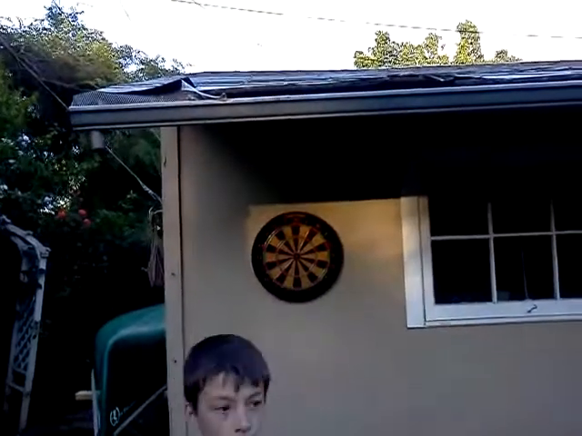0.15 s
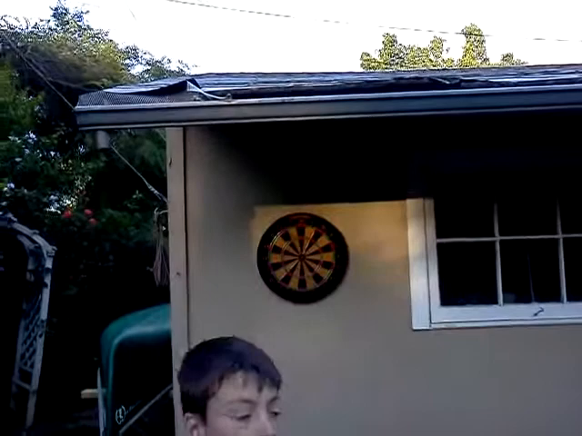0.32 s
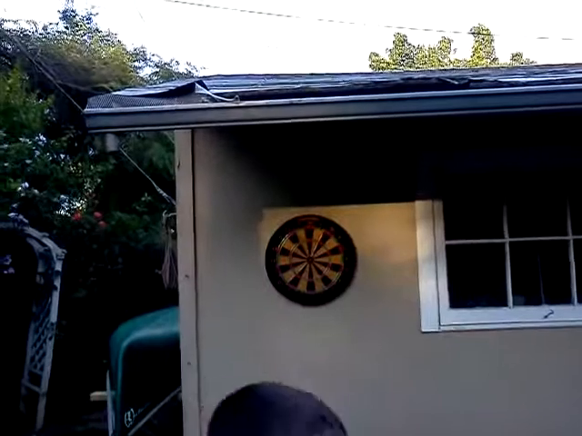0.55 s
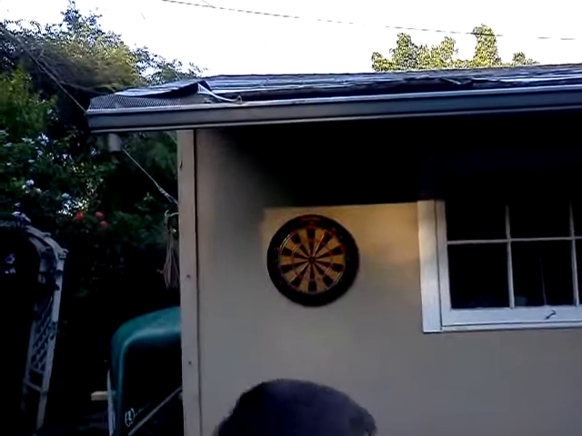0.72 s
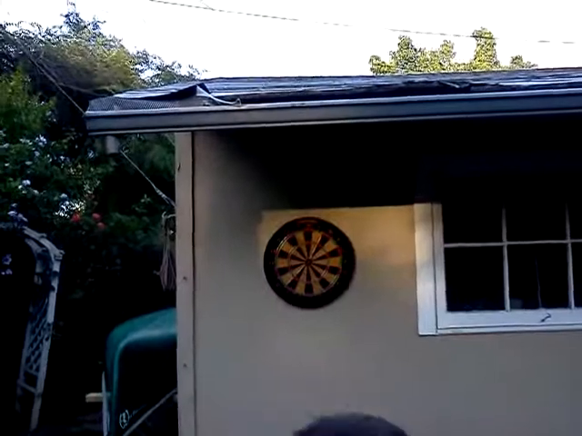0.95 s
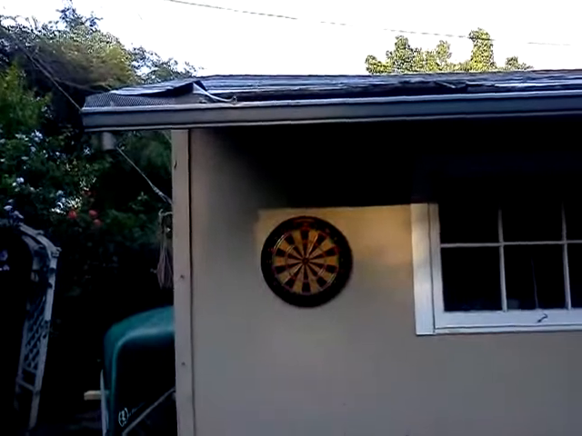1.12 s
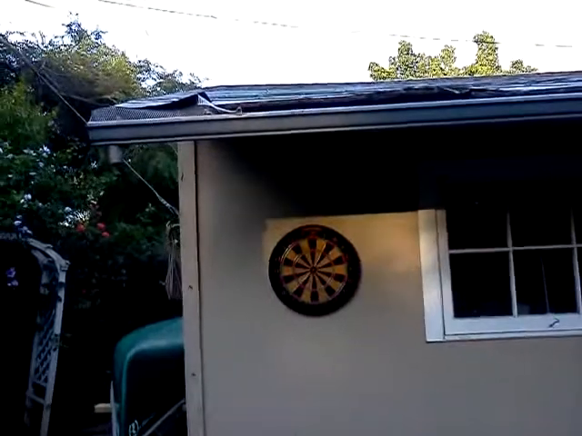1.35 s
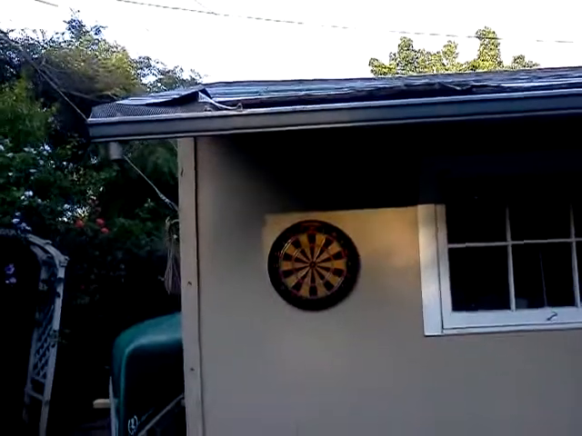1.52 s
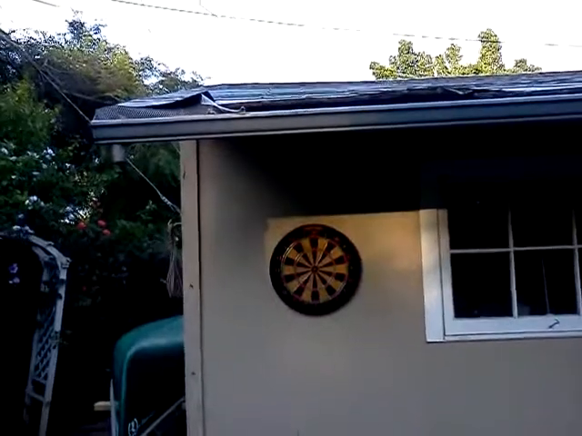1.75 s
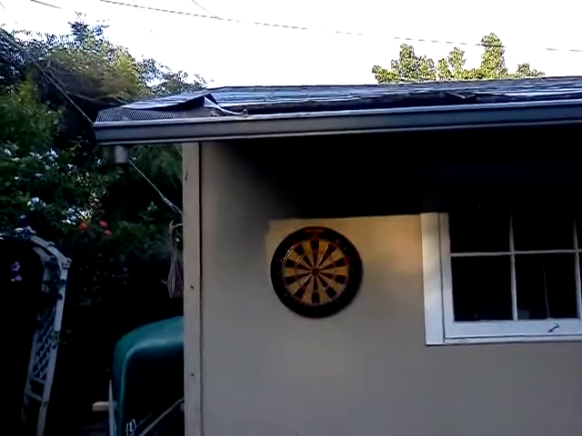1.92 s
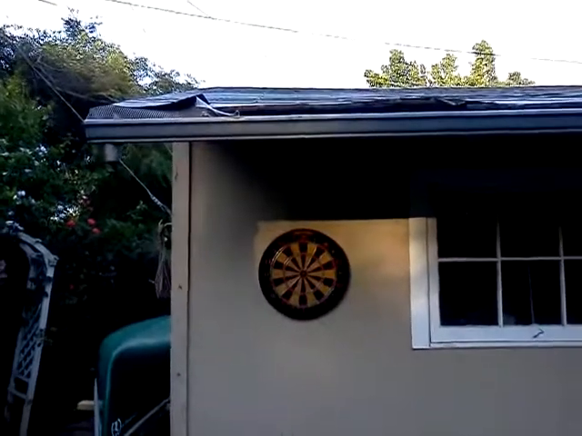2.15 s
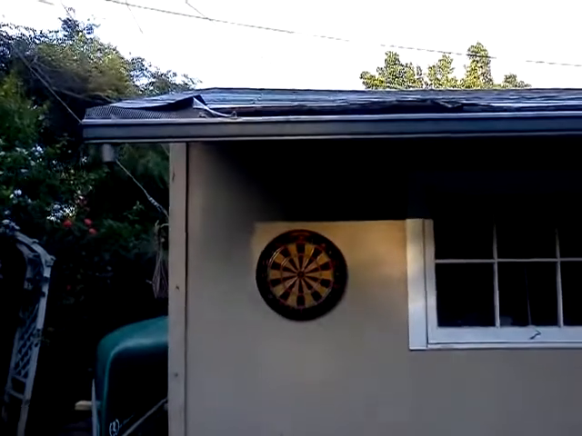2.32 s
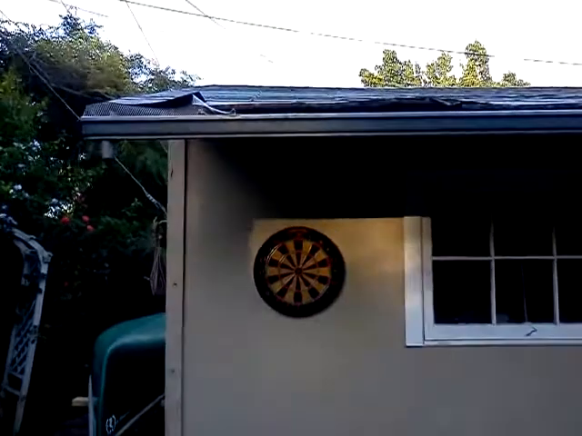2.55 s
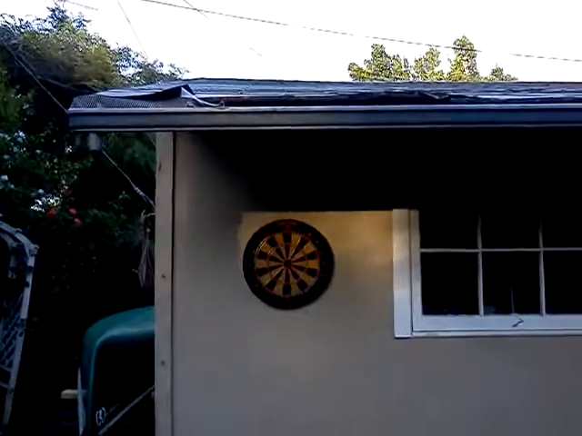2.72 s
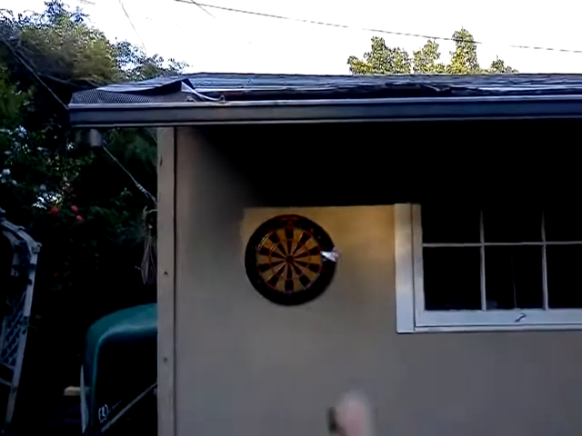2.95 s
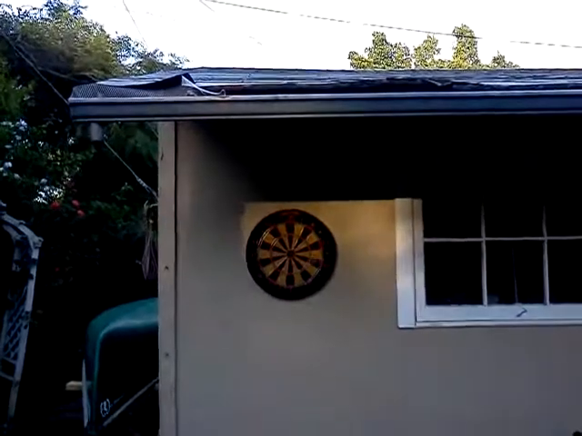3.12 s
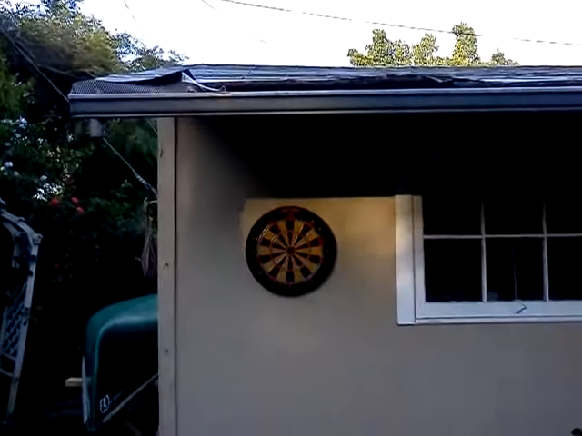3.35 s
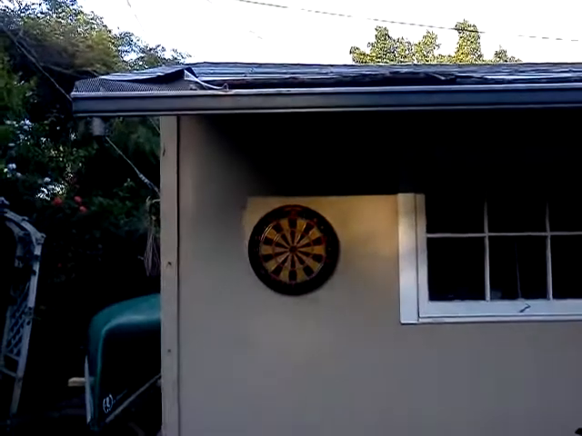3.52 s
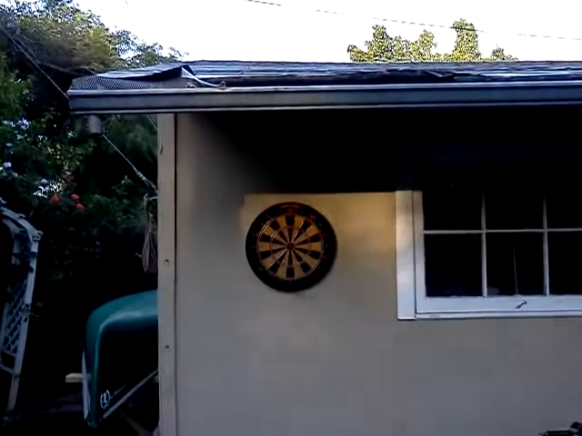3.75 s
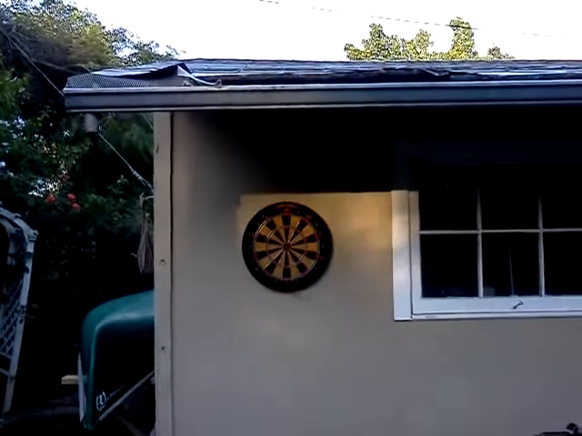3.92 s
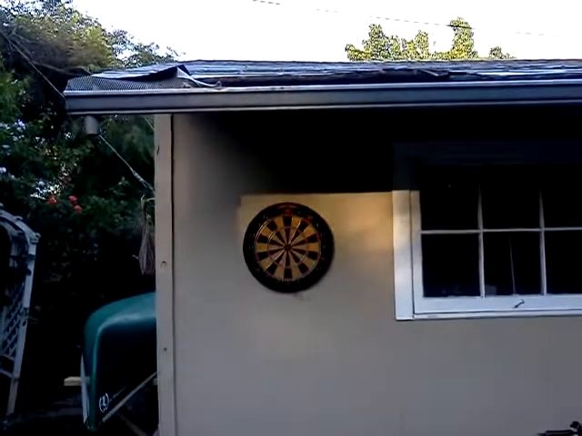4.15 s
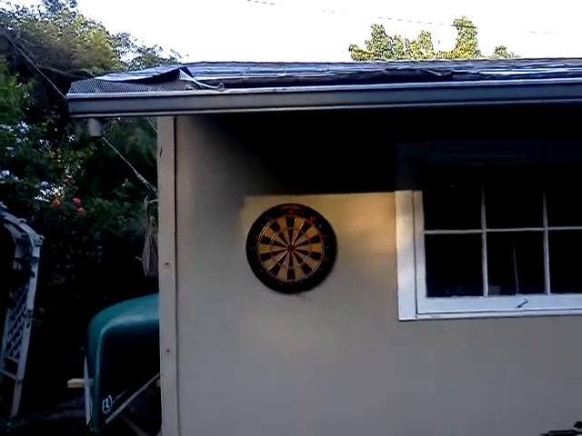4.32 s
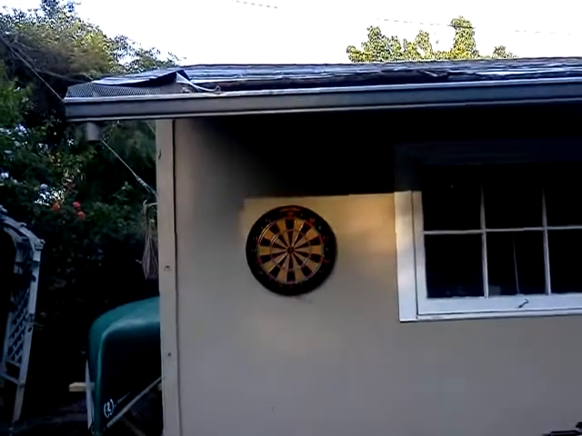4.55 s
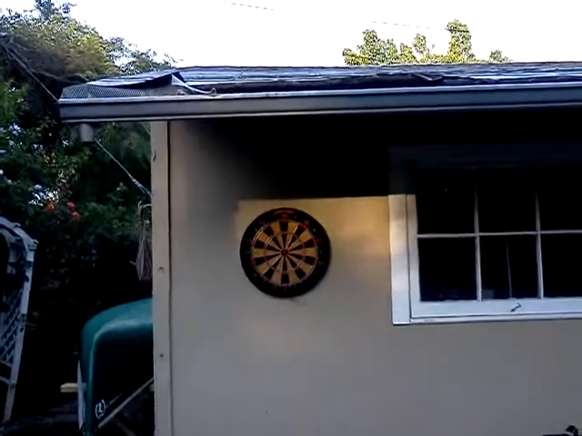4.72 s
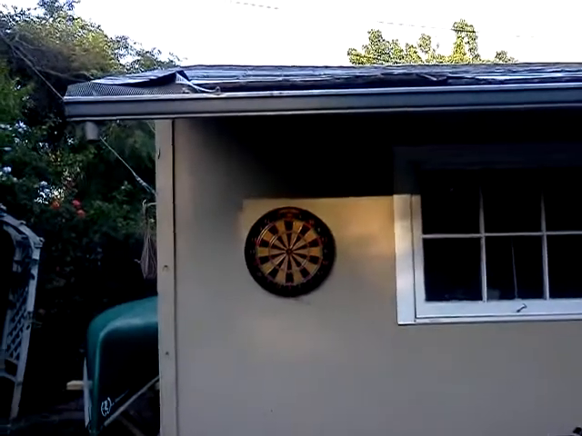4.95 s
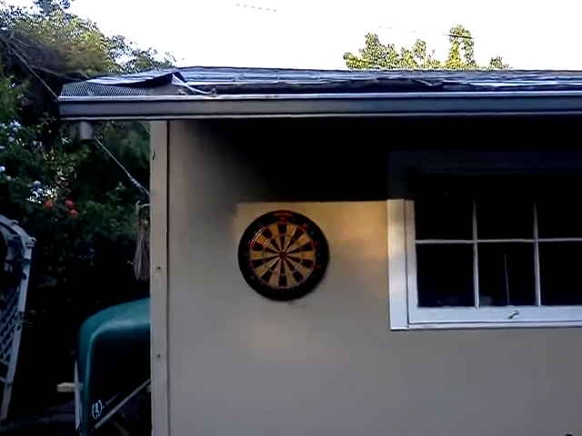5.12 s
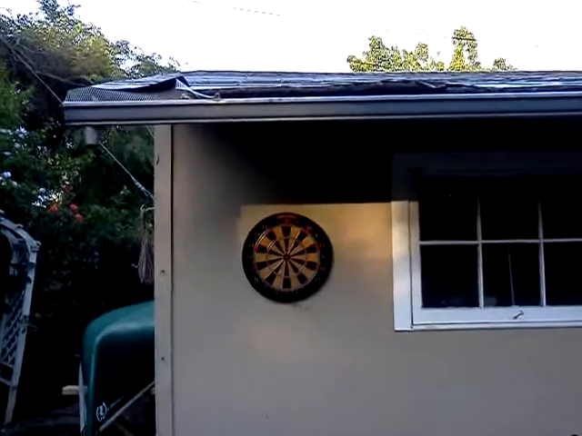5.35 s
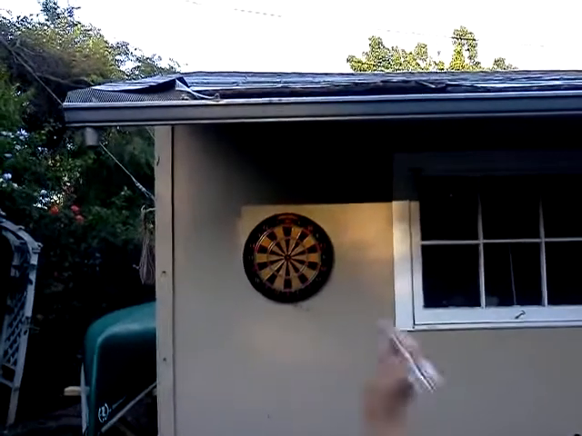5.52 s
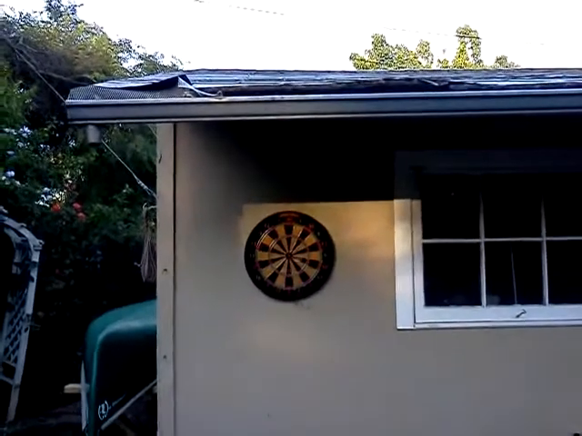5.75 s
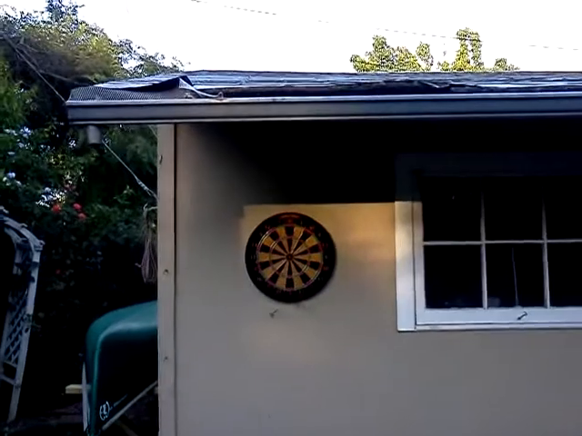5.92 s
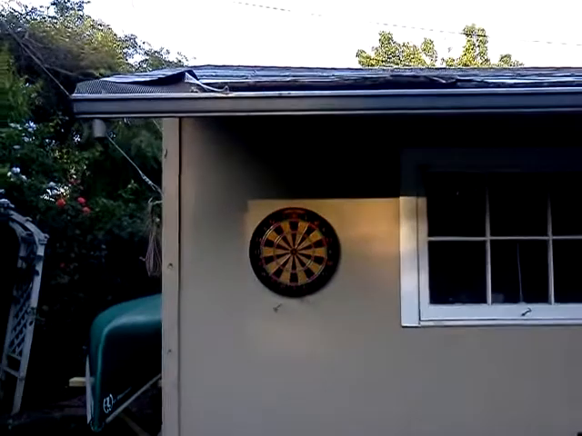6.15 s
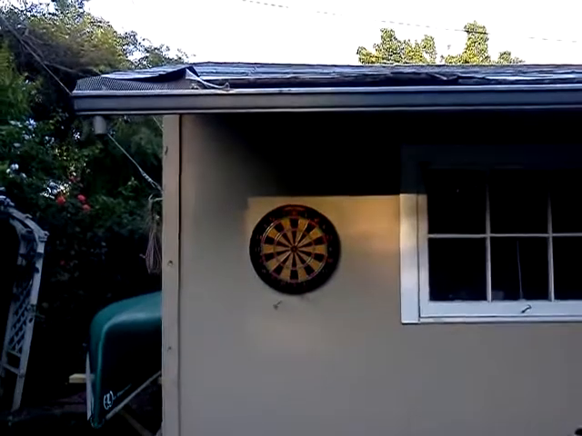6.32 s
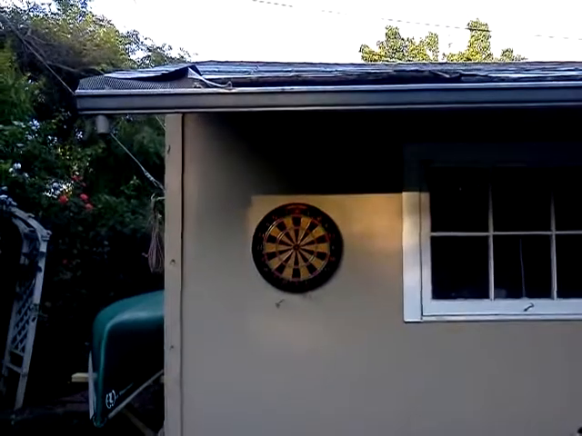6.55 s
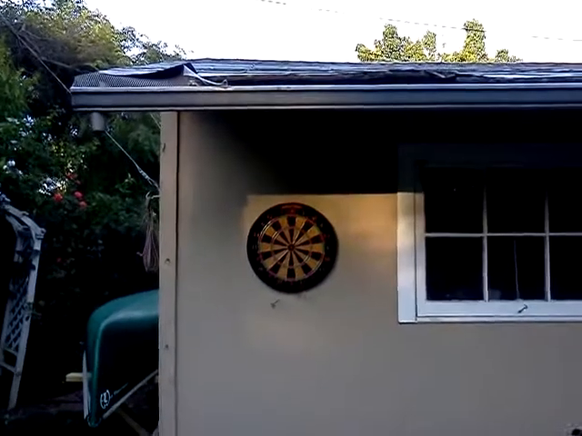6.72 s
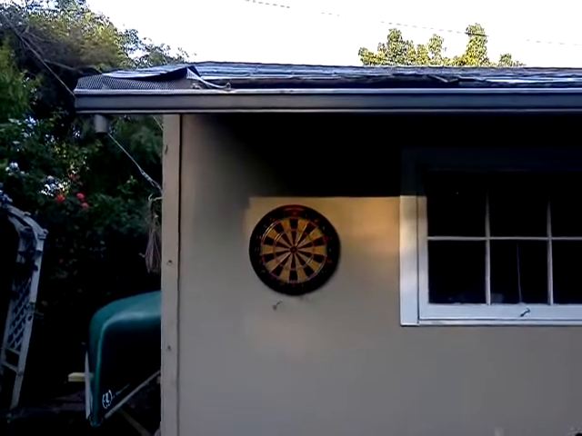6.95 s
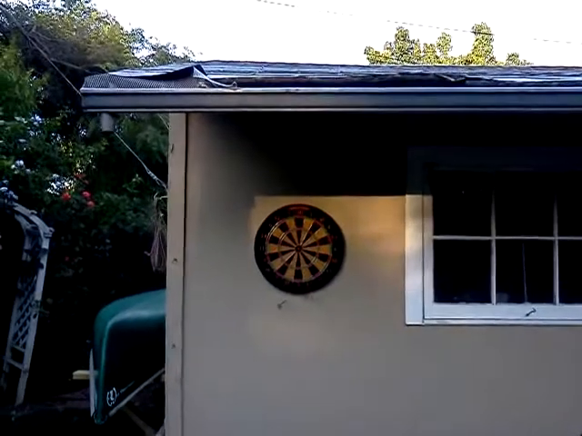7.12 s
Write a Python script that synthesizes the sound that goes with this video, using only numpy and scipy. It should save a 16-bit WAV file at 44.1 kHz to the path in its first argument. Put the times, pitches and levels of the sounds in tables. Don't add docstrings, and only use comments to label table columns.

```python
import sys
import numpy as np
from scipy import signal
from scipy.io import wavfile
from scipy.ndimage import uniform_filter1d

SR = 44100
rng = np.random.default_rng(int(sys.argv[2]) if len(sys.argv) > 2 else 0)


def master(y):
    cut = np.clip(np.atleast_2d(y).T, -1, 1)
    pcm = np.round(cut * 32767)
    wavfile.write(sys.argv[1], SR, pcm.astype(np.int16))


def volts_from_decibels(level):
    exponent = np.asarray(level, float) / 20
    return 10 ** exponent


N = 316365

# f/Hz, level/dB per Hz
YARD_WASH = [(15, -58.5), (40, -18), (90, -20.5), (150, -22.5), (232, 1), (350, -0.5), (560, -7.5),
             (950, -10), (1300, -17), (1700, -20), (2100, -25), (3300, -25.5), (4500, -29)]
# f/Hz, rms level/dB
MAINS_HUM = [(250, -73), (350, -52), (400, -60.5), (600, -64), (700, -78.5)]
# t/s, length/s, level/dB
RUSTLE = [
    (0, 0.051, -63),
    (0.282, 0.15, -62),
    (0.546, 0.076, -68),
    (0.794, .11, -63),
    (4.39, .12, -86.5),
]
# t/s, peak level/dB, f/Hz, T60/s
TICKS = [
    (0.33, -35.5, 1180, 0.025),
    (4.355, -63, 1260, .05),
    (4.415, -49, 1760, .06),
    (4.475, -50, 1860, 0.081),
    (4.555, -40, 1850, 0.025),
    (4.557, -51, 2670, .03),
]
# t/s, level/dB, clearness/dB per octave
ENGINE_PASS = [(0, -47.5, 4.5), (.35, -47.5, 2), (0.699, -45, 0.5), (1.2, -43, 2.5), (1.598, -42, 1),
               (1.899, -41, -1), (2.398, -41.5, 4), (2.798, -41.5, -2.5), (3.102, -44, -7.5),
               (3.702, -47.5, -6), (4.051, -45.5, -13.5), (4.45, -49.5, -3), (4.8, -56, 6),
               (5.5, -54.5, -3.5), (6.399, -57, 8)]
# multiple of the cycle rate, level/dB against neighbouring strong orders
FIRING_ORDERS = [(4.5, -13), (6, 0.5), (8, -21.5), (8.5, -4.5), (9.5, -8.5), (11, -4), (12, 0), (13.5, -12),
                 (15, -4.5), (16, -2.5), (17.5, -14), (19, -7.5), (20, -16.5), (24, -16), (31, -22)]
# order, slope/dB per dB of loudness, level/dB gained ahead and lost behind
BEAM = [(6, 1.73, -1), (12, 2, -6.5), (16, 1.3, 7), (19, 1.7, 4.5)]
# f/Hz, level/dB per Hz
EXHAUST_ROAR = [(30, -41.5), (60, -12), (125, -20), (216, -1.5), (300, -1.5), (450, -1.5), (650, -4.5),
                (900, -10.5), (1250, -22), (1700, -32.5), (2500, -49.5), (4000, -81)]
# f/Hz, T60/s
TAIL_DECAY = [(150, 0.57), (400, 0.37), (1000, 0.48), (2000, 0.49), (4000, 0.63)]
# f/Hz, level/dB
SURFACE_LOSS = [(1800, -2), (2600, -8), (4500, -18)]
# delay/s, level/dB, brightness 0-1
SLAPS = [
    [(.05, -21.5, 0), (.085, -29.5, 0), (.125, -29.5, 0), (.19, -41, .4)],
    [(.052, -20, 0.3), (.072, -28.5, 0), (.108, -27.5, 1), (.165, -37, 0.4)],
]
# t/s, blow level/dB, crack level/dB, free ringing/s, damping/dB
DARTS = [
    (3.2546, 1, -4.5, .034, 0),
    (5.9001, 7, -0.5, 0.014, -15.5),
]
# f/Hz, level/dB, T60/s
WALL_MODES = [
    [(238.9, 4, 0.11), (306, -13.5, 0.19), (338.2, -9, 0.29), (407.5, -15.5, 0.18), (426.2, -8.5, 0.26),
     (526, 0, 0.082), (641.5, 13, 0.037), (793.5, -14, .12), (847, -4, 0.066), (1087, -9, 0.075),
     (1175, -13.5, .08), (1457, 7.5, 0.023), (1880, -11.5, 0.087), (2000, -9.5, 0.053), (2400, -11, 0.0079)],
    [(233.7, -15, 0.25), (272.7, 1, 0.27), (340, -0.5, 0.21), (395.8, -6.5, 0.24), (467, -13, 0.21),
     (605, -4, 0.09), (679.2, -0.5, 0.083), (777.5, -15, 0.15), (978, -7, 0.16), (1221, -8, 0.062),
     (1317, -1.5, 0.045), (1516, -9, 0.082), (1690, -13, 0.036), (1797, -24.5, 0.051), (2198, -14, 0.1)],
]
# f/Hz, level/dB per Hz
TIP_CRACK = [(30, -66.5), (100, -12), (240, -4.5), (650, 2), (1000, -8.5), (1500, -9), (2300, -20.5),
             (3300, -22), (4500, -17)]
# f/Hz, level/dB
MICROPHONE = [(3300, 0.5), (3500, -2), (3700, -8), (4100, -16.5), (4400, -32), (4700, -63)]

WASH_DB, WASH_PATCHY_DB = -48, 0.9
RUSTLE_RISE_S, RUSTLE_FALL_S = 0.0456, 0.011
CYCLE_HZ, DOPPLER_HZ = 37.58, 0.62
ABREAST_S, PASS_S = 2.0, 3.0
TONE_DB, LOUDEST_DB = -44.5, -41
TONE_CLEAR = 1.1
TAIL_DB = -13.5
SCATTER_T60_S = 0.12
RISE_S, SETTLE_S, CRACK_T60_S = 0.012, 0.018, 0.08
COUPLING_HZ = 50
LIMIT_DB, LIMIT_SHARE = -6.5, 0.43


def evened(x):
    return x / np.sqrt(np.mean(x ** 2) + 1e-20)


def read(points, hz):
    f, value = np.transpose(points)
    return np.interp(np.log(hz + 1), np.log(f + 1), value)


def add(mix, s, sound):
    part = mix[round(s * SR):][:len(sound)]
    part += sound[:len(part)]


def drift(top_hz):
    t = np.arange(0, N + 256, 256) / SR
    rates = np.geomspace(top_hz / 16, top_hz, num=16)
    waves = sum(np.sin(2 * np.pi * (f * t + rng.random())) for f in rates)
    return np.interp(np.arange(N) / SR, t, evened(waves))


def noise(shape_db, patchy_db):
    frames, hz = N // 256 + 5, np.fft.rfftfreq(1024, 1 / SR)
    t = np.arange(frames) * 256 / SR
    real, imaginary, patches = rng.standard_normal((frames, 513, 3)).T
    patches = uniform_filter1d(patches, size=8, axis=0)
    patches = evened(uniform_filter1d(patches, size=10, axis=1))
    gain = volts_from_decibels(shape_db(hz[:, None], t) + patchy_db * patches)
    return signal.istft((real + 1j * imaginary) * gain, nperseg=1024, noverlap=768)[1][:N]


def coloured(x, points):
    gain_db = np.maximum(read(points, abs(np.fft.fftfreq(8192, 1 / SR))), -100)
    log_gain = np.log(volts_from_decibels(gain_db))
    taps = np.fft.ifft(np.exp(np.conj(signal.hilbert(log_gain)))).real[:4096]
    return signal.oaconvolve(x, taps)[:len(x)]


def yard_wash():
    level_db = WASH_DB + 0.22 * drift(top_hz=34)
    return volts_from_decibels(level_db) * evened(noise(lambda f, t: read(YARD_WASH, f), WASH_PATCHY_DB))


def mains_hum():
    t = np.arange(N) / SR
    out = np.zeros(N)
    for hz, db in MAINS_HUM:
        level = np.sqrt(2) * volts_from_decibels(db + 0.47 * drift(top_hz=4.2))
        out += level * np.sin(2 * np.pi * (hz * t + rng.random()))
    return out


def rustle():
    t = np.arange(N) / SR
    unevenness = uniform_filter1d(rng.standard_normal(N), size=100) * 10
    grains = rng.standard_normal(N) * volts_from_decibels(5.6 * unevenness)
    band = signal.butter(4, [1800, 3500], "band", fs=SR, output="sos")
    cloth = evened(signal.sosfilt(band, grains))
    out = np.zeros(N)
    for s, length, db in RUSTLE:
        rise = (t - s) / RUSTLE_RISE_S + 0.5
        fall = (s + length - t) / RUSTLE_FALL_S + 0.5
        out += volts_from_decibels(db) * np.clip(np.minimum(rise, fall), 0, 1) * cloth
    return out


def ticks():
    t = np.arange(4000) / SR
    out = np.zeros(N)
    for s, db, hz, t60 in TICKS:
        envelope = volts_from_decibels(db - 60 * t / t60) * np.minimum(t / 0.0017, 1)
        wobble = 1.2 * evened(uniform_filter1d(rng.standard_normal(len(t)), size=60))
        add(out, s, envelope * np.sin(2 * np.pi * hz * t + wobble))
    return out


def engine():
    t = np.arange(N) / SR
    s, level, clearness = np.transpose(ENGINE_PASS)
    roar_db = np.interp(t, s, level)
    clear_db = np.interp(t, s, clearness)
    facing = (ABREAST_S - t) / np.hypot(ABREAST_S - t, PASS_S)
    rate_hz = (CYCLE_HZ + DOPPLER_HZ * facing) * (1 + 0.0017 * drift(top_hz=8))
    turns = np.cumsum(rate_hz) / SR
    order, follow, ahead_db = np.transpose(BEAM)
    tones = np.zeros(N)
    for k, db in FIRING_ORDERS:
        near_db = TONE_DB + np.interp(k, order, follow) * (roar_db - LOUDEST_DB)
        near_db += np.interp(k, order, ahead_db) * facing
        near_db += max(np.log2(k / 12), 0) * TONE_CLEAR * clear_db
        level = np.sqrt(2) * volts_from_decibels(near_db + db + 2.58 * drift(top_hz=23.84))
        tones += level * np.cos(2 * np.pi * (k * turns + rng.random()))

    def roar_shape(f, time):
        octaves = np.clip(np.log2((f + 1) / 550), 0, 1.3)
        return read(EXHAUST_ROAR, f) + np.interp(time, s, clearness) * octaves

    throb = 1 + 0.2 * np.cos(2 * np.pi * turns)
    return tones + volts_from_decibels(roar_db - 1.0) * throb * evened(noise(roar_shape, patchy_db=-0.85))


def echoes(x, slaps):
    taps = np.zeros(SR // 2)
    at = np.arange(900, len(taps) - 20, 20)
    taps[at + rng.integers(0, 20, len(at))] = rng.choice([-1., 1.], len(at))
    hz, t, z = signal.stft(taps, SR, nperseg=256)
    decay = volts_from_decibels(-60 * t / read(TAIL_DECAY, hz)[:, None])
    response = signal.istft(z * decay, SR, nperseg=256)[1]
    response *= volts_from_decibels(TAIL_DB) / np.linalg.norm(response)
    for delay, db, bright in slaps:
        smear = rng.standard_normal(400) * np.hanning(400)
        smear -= bright * uniform_filter1d(smear, size=40)
        add(response, delay, volts_from_decibels(db) * smear / np.linalg.norm(smear))
    return signal.fftconvolve(coloured(x, SURFACE_LOSS), response)


def wall_ring(blow_db, free_s, damp_db, modes):
    t = np.arange(SR // 2) / SR
    ring = np.zeros(len(t))
    for hz, db, t60 in modes:
        spread = np.minimum(t / RISE_S * np.cbrt(hz / 500), 1)
        ring += spread * volts_from_decibels(db - 60 * t / t60) * np.sin(2 * np.pi * (hz * t + rng.random()))
    damping = volts_from_decibels(damp_db * np.clip((t - free_s) / SETTLE_S, 0, 1))
    return volts_from_decibels(blow_db) * 0.65 * ring * damping


def tip_crack(crack_db):
    t = np.arange(SR // 2) / SR
    bite = np.minimum(1.4 * t / RISE_S, 1) * volts_from_decibels(-60 * np.maximum(t - RISE_S, 0) / CRACK_T60_S)
    return volts_from_decibels(crack_db) * evened(coloured(rng.standard_normal(len(t)), TIP_CRACK)) * bite


def scene():
    out = yard_wash() + mains_hum() + rustle() + ticks() + engine()
    for (s, blow_db, crack_db, free_s, damp_db), modes, slaps in zip(DARTS, WALL_MODES, SLAPS):
        ring = wall_ring(blow_db, free_s, damp_db, modes)
        crack = tip_crack(crack_db)
        add(out, s, ring + crack)
        burst = ring * volts_from_decibels(-60 * np.arange(len(ring)) / SR / SCATTER_T60_S)
        add(out, s, echoes(volts_from_decibels(-0.5) * burst + volts_from_decibels(2) * crack, slaps))
    return out[None]


def band_limit(x):
    return signal.sosfilt(signal.butter(12, 16590, fs=SR, output="sos"), x)


def record(dry):
    coupled = signal.lfilter(*signal.butter(2, COUPLING_HZ, "high", fs=SR), dry[0])
    narrow = coloured(coupled, MICROPHONE)
    power = uniform_filter1d(uniform_filter1d(narrow ** 2, size=130), size=130)
    power_db = 10 * np.log10(abs(power) + 1e-12)
    held = narrow * volts_from_decibels(-LIMIT_SHARE * np.maximum(power_db - LIMIT_DB, 0))
    mix = np.clip(held[None], -0.71, 0.71)
    return band_limit(mix)


dry = scene()
out = record(dry)
master(out)
```